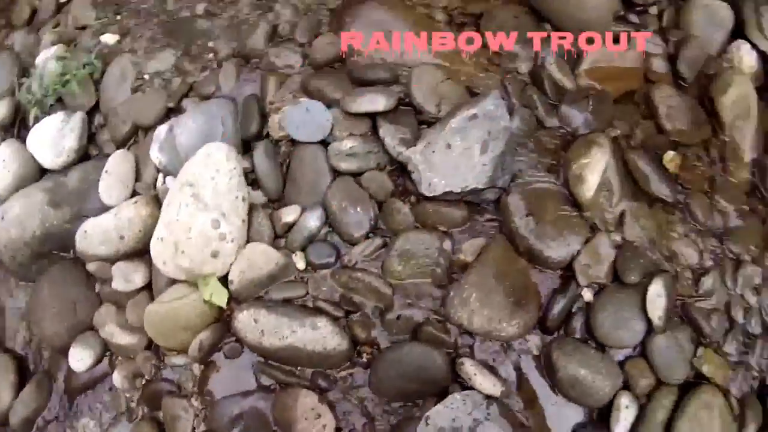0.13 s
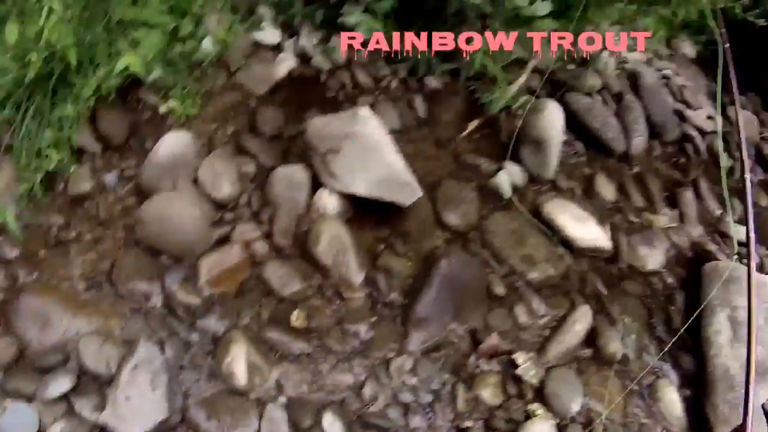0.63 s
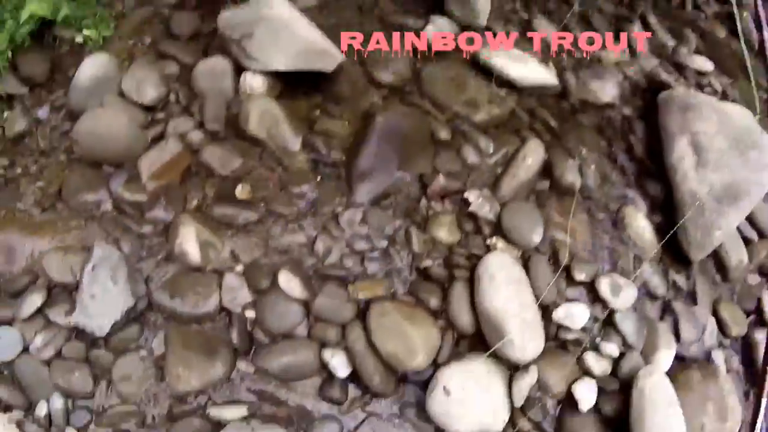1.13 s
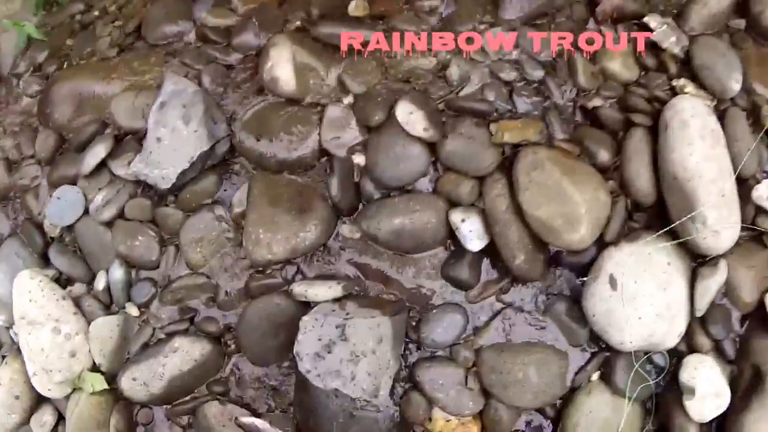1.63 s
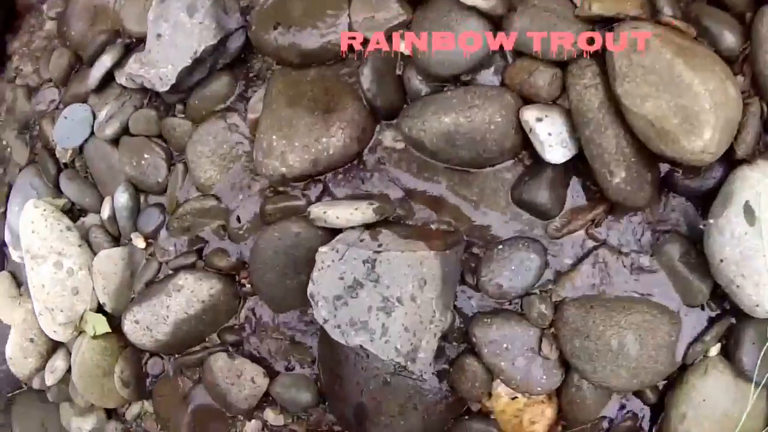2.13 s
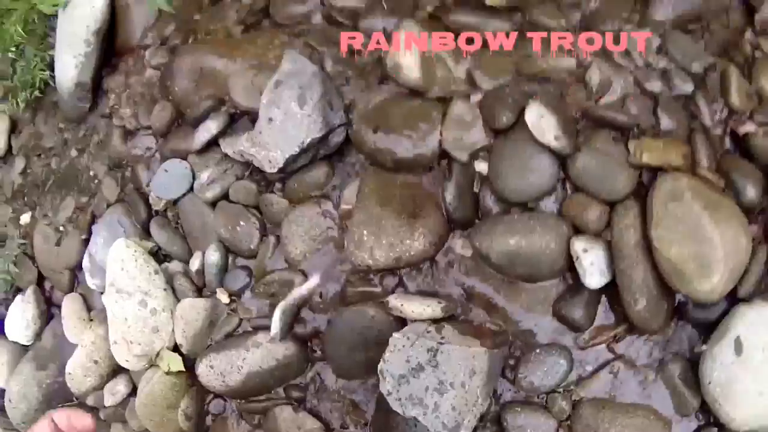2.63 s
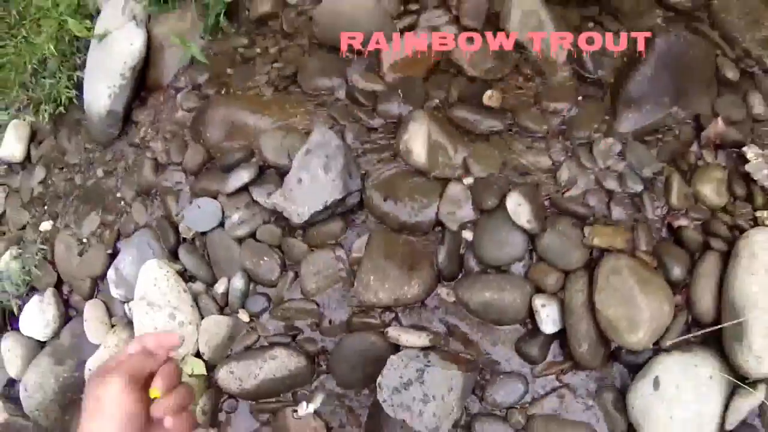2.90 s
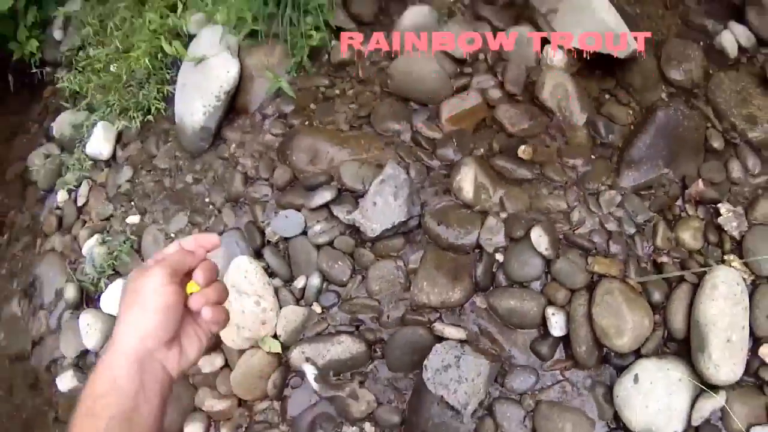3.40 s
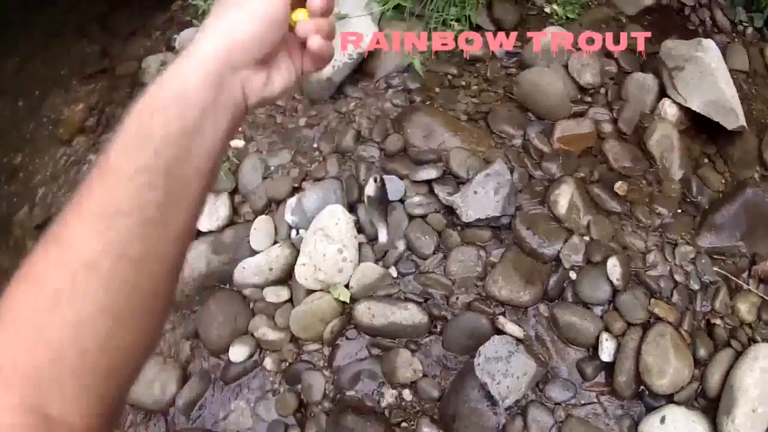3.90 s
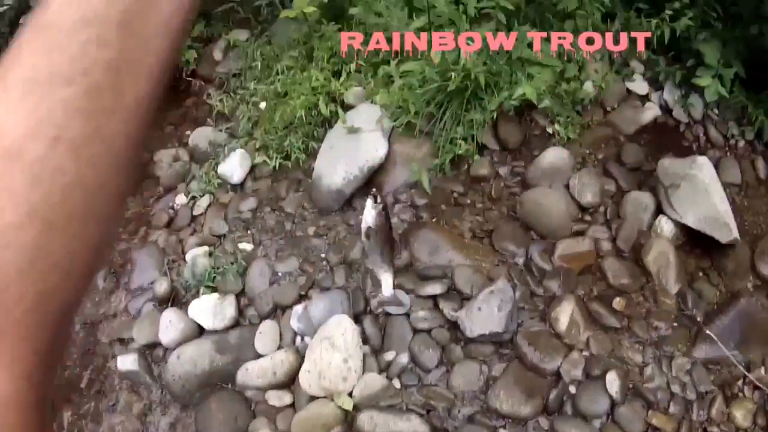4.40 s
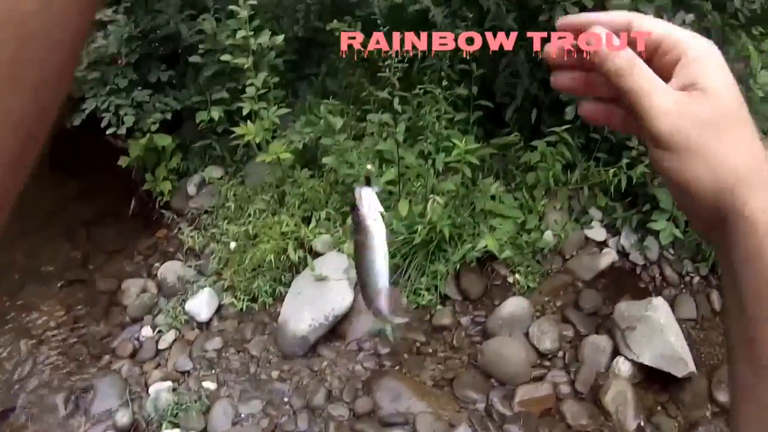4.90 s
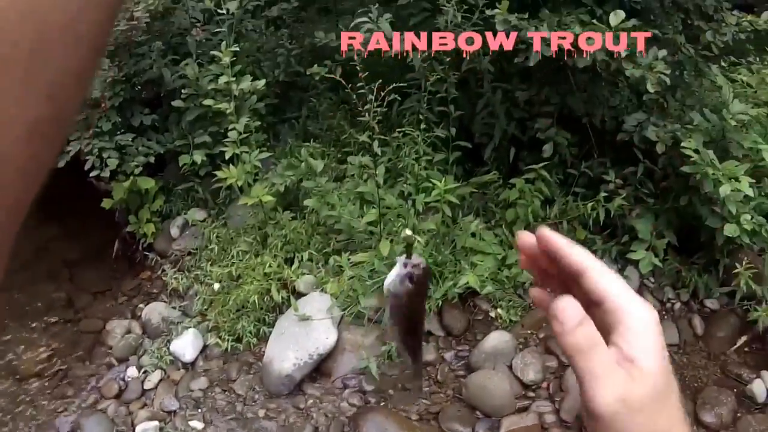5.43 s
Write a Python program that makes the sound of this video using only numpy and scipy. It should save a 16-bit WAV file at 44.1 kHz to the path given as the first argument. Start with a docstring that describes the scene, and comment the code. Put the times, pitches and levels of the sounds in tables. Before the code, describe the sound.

A small camera in a plastic case, worn on the body beside a rocky stream, hears constant rushing water with a slightly hollow, boxy colour. Low air rumble stirs underneath. A watery plip and a tight cluster of bright tackle ticks come before and around two seconds, one more shortly after. Then the case is rubbed and bumped for about a second, ending in a loud scraping crack, and the stream continues alone.

```python
"""A stony mountain stream heard from the bank through a small camera in a plastic case worn on the body.
The rush is flickering bands of noise and splash grains, coloured by the resonances of the case.
Air and body movement rumble far below it, as slow noise swings and single pressure lumps.
Ticks of fishing tackle and one watery plip are short decaying rings; later something rubs, bumps and
scrapes against the case, made of clicks, slips and swings that ring its wall and shell."""
import sys
import numpy as np
from scipy import signal
from scipy.fft import next_fast_len
from scipy.io import wavfile
from scipy.ndimage import uniform_filter1d

SR = 44100
rng = np.random.default_rng(int(sys.argv[2]) if len(sys.argv) > 2 else 0)


def dump(signal):
    """Clip the signal to [-1, 1] and save it as 16-bit WAV at the path in sys.argv[1]."""
    limited = np.clip(np.atleast_2d(signal).T, -1, 1)
    pcm = np.round(limited * 32767).astype(np.int16)
    wavfile.write(sys.argv[1], SR, pcm)


def gain_from_decibels(decibels):
    """Convert decibel values to linear amplitude factors."""
    exponent = np.asarray(decibels, float) / 20
    return 10 ** exponent


N = 244310


def rms_one(x):
    """Scale to an rms of one."""
    return x / np.sqrt(np.mean(x ** 2) + 1e-20)


def in_time(rows):
    """Each column after the time as a value per sample."""
    s, *columns = np.transpose(rows)
    return [np.interp(np.arange(N) / SR, s, c) for c in columns]


def add_at(out, s, sound):
    """Mix a short sound into out, starting at s seconds."""
    out[round(s * SR):][:len(sound)] += sound


def low_pass(x, order, hz):
    """Butterworth low-pass."""
    return signal.sosfilt(signal.butter(order, hz, fs=SR, output="sos"), x)


def band(x, low_hz, high_hz):
    """Butterworth band-pass."""
    sos = signal.butter(2, [low_hz, min(high_hz, 0.45 * SR)], "band", fs=SR, output="sos")
    return signal.sosfilt(sos, x)


def drift(rate_hz):
    """Slow random wander of rms one, made at a fortieth of the sample rate."""
    r = np.exp(-80 * np.pi * rate_hz / SR)
    noise = rng.standard_normal(N // 40 + 2002)
    slow = signal.lfilter([1], [1, -2 * r, r * r], noise)[2000:]   # drop the filter's start
    return np.interp(np.arange(N) / 40, np.arange(len(slow)), rms_one(slow))


def grains(per_s, spread_db, size=N):
    """Random clicks of uneven strength and sign."""
    strength = gain_from_decibels(spread_db * np.minimum(rng.exponential(1, size), 4))
    strength = strength * rng.choice([-1, 1], size)
    return strength * (rng.random(size) < per_s / SR) + 1e-18


def resonance(x, hz, width_hz):
    """Two-pole resonance with gain one on top."""
    r = np.exp(-np.pi * width_hz / SR)
    poles = [1, -2 * r * np.cos(2 * np.pi * hz / SR), r * r]
    return signal.lfilter([(1 - r * r) / 2, 0, (r * r - 1) / 2], poles, x)


def through_case(x):
    """Air resonances in front of the microphone lift or dip the sound that passes through the case."""
    # air resonances of the case: f/Hz, width/Hz, boost/dB
    air_modes = [(1325, 114, 9), (2450, 560, 2.5), (3100, 1080, 6.5), (4470, 200, 3), (4720, 73, 7.5),
                 (5850, 360, 5), (7630, 700, -4.5), (8840, 460, 4), (9500, 380, 2.5), (11000, 430, 2.5),
                 (14100, 530, 1)]
    for hz, width_hz, boost_db in air_modes:
        x = x + (gain_from_decibels(boost_db) - 1) * resonance(x, hz, width_hz)
    return x


def through_shell(x):
    """Contact also travels in the plastic and rings its low modes."""
    # low modes of the shell: f/Hz, width/Hz, level/dB
    shell_modes = [(58.4, 34, 9.5), (110, 124, 3), (230, 40, 2), (800, 900, -3)]
    return sum(gain_from_decibels(db) * resonance(x, hz, width_hz) for hz, width_hz, db in shell_modes)


def wall(x):
    """Contact rings the case wall at modes that snaps and scrapes share."""
    # rings of the wall: f/Hz, width/Hz, level/dB
    wall_modes = [(1820, 28, -6), (2450, 130, -9.5), (2910, 380, -1), (3540, 300, -14)]
    return sum(gain_from_decibels(db) * resonance(x, hz, width_hz) for hz, width_hz, db in wall_modes)


def crack(hz, size):
    """Noise that spreads upward from a pitch."""
    noise = band(rng.standard_normal(size), 0.8 * hz, min(3.5 * hz, 13000))
    return rms_one(through_case(noise))


def struck(t, db, t60):
    """A quick swell, then an even decay."""
    return gain_from_decibels(db - 60 * t / t60) * (1 - np.exp(-t / (0.036 * t60)))


def rumble():
    """Slow pressure swings on the port, falling steeply above 30 Hz; the gusts set their size."""
    # gusts on the port: t/s, level before the last low-pass/dB
    gusts = [(0.0, -33), (0.13, -47), (0.29, -36.5), (0.42, -48), (0.7, -53), (0.86, -44), (1.25, -51.5),
             (1.42, -55.5), (1.85, -47.5), (2.3, -52), (2.68, -50), (2.95, -36.5), (3.38, -57), (3.46, -38),
             (3.68, -42.5), (3.85, -34), (4.27, -41), (4.39, -47), (5.54, -53)]
    flicker_db, flicker_hz = 3.5, 5
    air = low_pass(band(rng.standard_normal(N), 10.7, 36.0), 3, 28.0)
    envelope = np.abs(signal.hilbert(air, next_fast_len(N))[:N])
    air = air / (0.64 * air.std() + envelope)   # evens out the noise's own swells
    gust_db = in_time(gusts)[0] + flicker_db * drift(flicker_hz)
    return low_pass(gain_from_decibels(gust_db) * rms_one(air), 2, 45.0)


def lumps():
    """Each lone pressure lump bulges the membrane once each way."""
    # pressure lumps: middle t/s, peak level/dB, half-width/s (outward first; negative if inward first)
    bulges = [(0.266, -32.5, 0.015), (.48, -33.5, .011), (.603, -45, .011), (1.035, -37, 0.01),
              (1.115, -33, 0.0098), (1.513, -41, .011), (1.59, -39.5, 0.011), (1.987, -40, 0.0091),
              (2.76, -38.5, 0.016), (2.96, -29, -0.0068), (3.457, -29.5, 0.0059), (3.484, -31, .006),
              (3.917, -25.5, 0.015), (4.0, -33, .012)]
    out, t = np.zeros(N), np.arange(N) / SR
    for s, db, half_s in bulges:
        u = (t - s) / half_s
        out -= gain_from_decibels(db) * u * np.exp((1 - u ** 2) / 2)
    return out


def pushes():
    """A blow pushes the whole case: the membrane swings inward first and dies within a few cycles."""
    # blows: t/s, level at the start of the decay/dB, swing f/Hz, t60/s
    blows = [(3.619, -19, 32.5, 0.16), (4.287, -17.5, 19.7, 0.26)]
    out, t = np.zeros(N), np.arange(SR // 2) / SR
    for s, db, hz, t60 in blows:
        add_at(out, s, -gain_from_decibels(db - 60 * t / t60) * np.sin(2 * np.pi * hz * t))
    return out


def thumps():
    """A soft blow on the shell swells in a few milliseconds and dies in about 60 ms."""
    # soft blows: t/s, level before swell and decay/dB, f/Hz
    soft_blows = [(3.486, -27, 110), (3.569, -25.5, 89), (3.614, -27, 135), (3.664, -33, 110),
                  (3.833, -28, 233), (3.888, -39, 91.5), (3.962, -30, 124), (4.06, -36, 65),
                  (4.222, -34, 170), (4.263, -27.5, 126), (4.3, -31, 85), (4.345, -34, 60)]
    t60, swell_s = 0.061, 0.0029
    out, t = np.zeros(N), np.arange(SR // 8) / SR
    for s, db, hz in soft_blows:
        envelope = gain_from_decibels(db - 60 * t / t60) * (1 - np.exp(-t / swell_s))
        add_at(out, s, envelope * np.sin(2 * np.pi * hz * t))
    return out


def jostle():
    """Clumped dull bumps ring the shell as the case is jostled, with a rustle of cloth on it."""
    # jostling: t/s, dull shuffle level/dB, cloth rustle level/dB
    moves = [(3.36, -79, -79), (3.462, -42.5, -45), (3.53, -44, -56), (3.62, -43, -40.5),
             (3.672, -42, -57.5), (3.81, -44.5, -50.5), (3.93, -48.5, -64), (4.162, -49, -56),
             (4.3, -44.5, -43), (4.44, -82, -109)]
    before, after = (moves[0][0] - 0.02, -90, -90), (moves[-1][0] + 0.02, -90, -90)
    shuffle_db, rustle_db = in_time([before, *moves, after])
    bumps = through_shell(grains(700.0 * gain_from_decibels(3.0 * drift(12.0)), 2.8))
    shuffle = rms_one(low_pass(bumps, 2, 1100.0))   # soft contact
    rubs = grains(2000.0 * gain_from_decibels(8.1 * drift(18.0)), 0.5)
    rustle = rms_one(through_case(band(rubs, 500.0, 2140.0)))
    return gain_from_decibels(shuffle_db) * shuffle + gain_from_decibels(rustle_db) * rustle


def snaps():
    """A hard contact is a click between two weaker ones, kept in its band while the wall rings briefly."""
    # hard contacts: t/s, peak level/dB, lowest f/Hz, highest f/Hz
    contacts = [(3.4105, -40, 2000, 6000), (3.4505, -32, 1500, 5000), (3.496, -29, 600, 4500),
                (3.6085, -30, 2600, 6000), (3.6688, -26, 500, 2800), (4.2662, -4.5, 500, 4000)]
    out, click = np.zeros(N), np.zeros(SR // 20)
    click[[0, 23, 60]] = -0.6, 1, 0.3   # samples
    for s, db, low_hz, high_hz in contacts:
        ringing = band(click + gain_from_decibels(8.0) * wall(click), low_hz, high_hz)
        body = band(ringing, 0.7 * low_hz, 1.4 * high_hz) + gain_from_decibels(-34.0) * click
        add_at(out, s, gain_from_decibels(db) * body / np.abs(body).max())
    return out


def scrapes():
    """Dense uneven slips ring the wall and two resonances of their own, with a thin hiss on top."""
    # scrapes: start t/s, rms level/dB, length/s, low ring f/Hz, low ring level/dB, top ring f/Hz
    strokes = [(3.405, -50, 0.054, 1000, -1, 5240), (3.432, -37, .1, 780, 7, 5220),
               (3.551, -48.5, 0.078, 900, 9, 4000), (3.6204, -26, 0.025, 1360, -4, 4340),
               (3.687, -54, 0.033, 7350, 8., 7900), (3.733, -47, 0.046, 1300, 9.5, 4500),
               (3.83, -48.5, 0.085, 800, 15, 1420), (4.202, -46.5, 0.069, 1500, -1, 4400),
               (4.2646, -20, 0.031, 1515, 2.5, 4410)]
    out, t = np.zeros(N), np.arange(SR // 5) / SR
    for s, db, length, low_hz, low_db, top_hz in strokes:
        swell, fall = np.clip([t / (0.33 * length), (length - t) / (0.67 * length)], 0, 1)
        wander = uniform_filter1d(rng.standard_normal(len(t)), round(0.07 * length * SR))
        clumps = gain_from_decibels(1.5 * rms_one(wander))   # slips bunch up
        slips = grains(10000.0, 2.3, size=len(t)) * clumps * swell ** 0.6 * fall ** 1.06
        low_ring = resonance(resonance(slips, low_hz, 0.18 * low_hz), low_hz, 0.18 * low_hz)
        top_ring = resonance(slips, top_hz, 224.0)
        rings = wall(slips) - gain_from_decibels(low_db) * low_ring - gain_from_decibels(5.0) * top_ring
        body = band(band(rings, 640.0, 4000.0), 300.0, 6500.0)
        body = body + gain_from_decibels(-15.0) * band(band(slips, 500.0, 5200.0), 400.0, 7150.0)
        hiss_db = -28.0 - 92.0 * length   # quick scrapes hiss more
        body = body + gain_from_decibels(hiss_db) * band(slips, 11400.0, 18000.0)
        add_at(out, s, gain_from_decibels(db) * body / np.sqrt(np.sum(body ** 2) / (length * SR)))
    return out


def ticks_and_plip():
    """Ticks of tackle, and one lower watery plip at 1.673 s, ring as short decaying tones with a bright edge."""
    # ticks and plip: t/s, ring level before swell and decay/dB, f/Hz, t60/s, overtone and crack level re ring/dB
    rows = [(.3247, -36.5, 3700, 0.019, -23), (1.673, -29, 1310, 0.024, -28),
            (1.967, -34.5, 3600, 0.029, -4.5), (1.976, -33.5, 3050, 0.025, -8),
            (1.986, -36.5, 3100, 0.023, -10), (1.993, -21, 3080, 0.015, -20),
            (1.998, -25, 3040, 0.016, -20), (2.0028, -34, 3100, .022, -17),
            (2.0277, -26.5, 3240, 0.021, -10.5), (2.403, -23.5, 2990, 0.028, -16.5),
            (2.477, -50.5, 2520, 0.015, -3), (2.509, -37, 2690, 0.027, -14)]
    overtone_hz, overtone_over_crack_db = 4680, 2.5
    twin_ratio, twin_db = 1.1, -9.5   # a close second mode makes the ring beat
    out, t = np.zeros(N), np.arange(SR // 10) / SR
    overtone = gain_from_decibels(overtone_over_crack_db) * np.sin(2 * np.pi * overtone_hz * t)
    for s, db, hz, t60, edge_db in rows:
        twin = gain_from_decibels(twin_db) * np.sin(2 * np.pi * twin_ratio * hz * t)
        ring = np.sin(2 * np.pi * hz * t) + twin
        edge = overtone + crack(hz, size=len(t))
        add_at(out, s, struck(t, db, t60) * (ring + gain_from_decibels(edge_db) * edge))
    return out


def splashes():
    """Small bright splashes are short decaying puffs of high noise."""
    # splashes: t/s, level before swell and decay/dB, t60/s
    puffs = [(.286, -56.5, .02), (.756, -53, .06), (1.612, -54, .084)]
    splash_hz = 8500
    out, t = np.zeros(N), np.arange(SR // 10) / SR
    for s, db, t60 in puffs:
        add_at(out, s, struck(t, db, t60) * crack(splash_hz, size=len(t)))
    return out


def stream():
    """Broken water in third-octave bands: far roar plus near splash grains, each band flickering a little."""
    # the stream as the wearer turns: t/s, rush level/dB, extra low roar level/dB, extra spray level/dB
    flow = [(0.0, -49.5, 1.5, 3), (1.83, -46.5, -1.5, 3.5), (1.98, -47.5, 0, 3), (3.38, -48.5, 0, 2),
            (4.42, -50.5, 2, 2), (4.75, -49, 1, 0.5), (5.278, -47, -1, -1.5), (5.54, -48, 0, 0)]
    # spectrum of the rush: f/Hz, relative level per Hz/dB
    spectrum = [(32, -34), (55, 4.5), (60, -4.5), (479, -3.5), (681, -3.5), (1320, -1.5), (1630, -7),
                (2930, -10.5), (3980, -20), (4800, -20), (15200, -35)]
    rush_db, roar_db, spray_db = in_time(flow)
    hz_points, db_points = np.transpose(spectrum)
    edges_hz = 50 * 2 ** np.arange(0, 8.5, 1 / 3)
    surge = drift(3.0)   # shared by all bands
    water = []
    for _ in range(2):   # neighbouring bands take turns between two waters
        near = rms_one(grains(1500.0 * gain_from_decibels(4.6 * drift(15.0)), 4.1))
        water.append(rng.standard_normal(N) + gain_from_decibels(-3.0) * near)
    out = 0
    for k, (low, high) in enumerate(zip(edges_hz, edges_hz[1:])):
        hz = np.sqrt(low * high)
        # roar fades out from 700 to 1300 Hz
        facing_db = np.interp(np.log(hz), np.log([700, 1300]), [1, 0]) * roar_db
        # the treble depends on facing the water: spray fades in from 2.5 to 5 kHz
        facing_db = facing_db + np.clip(np.log2(hz / 2500), 0, 1) * spray_db
        level_db = np.interp(np.log(hz), np.log(hz_points), db_points) + facing_db
        flicker_db = 0.065 * surge + 0.85 * drift(11.0)
        out = out + gain_from_decibels(level_db + flicker_db) * band(water[k % 2], low, high)
    cased = through_case(out)
    middle = np.std(band(cased, 1000, 4000))   # the rush level refers to this range
    return gain_from_decibels(rush_db) * cased / middle


def scene():
    """All sources reach one microphone."""
    air = rumble() + lumps()
    contact = pushes() + thumps() + jostle() + snaps() + scrapes()
    water = splashes() + stream()
    return (air + contact + ticks_and_plip() + water)[None]


def roll_off(x):
    """The treble ends steeply here."""
    return signal.sosfilt(signal.butter(12, 16510, fs=SR, output="sos"), x)


def record(dry):
    """A steep elliptic low-pass cuts the top."""
    cutoff_hz = 15230
    steep = signal.ellip(10, 0.5, 50, cutoff_hz, fs=SR, output="sos")
    mix = signal.sosfilt(steep, dry)
    return roll_off(mix)


dry = scene()
out = record(dry)
dump(out)
```